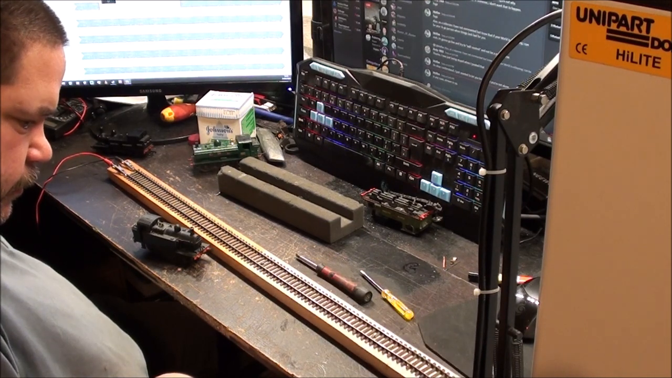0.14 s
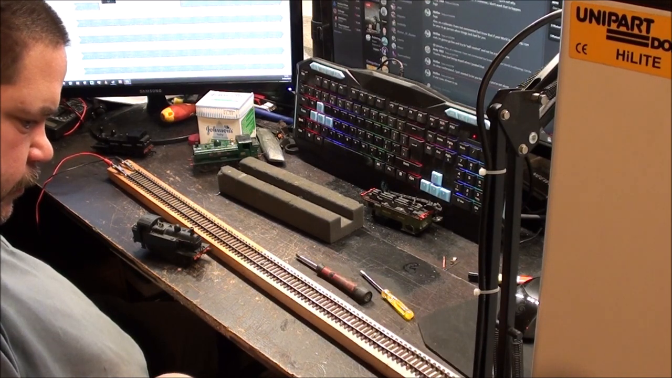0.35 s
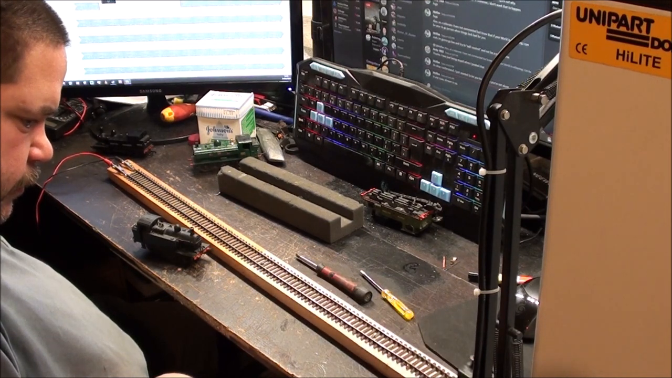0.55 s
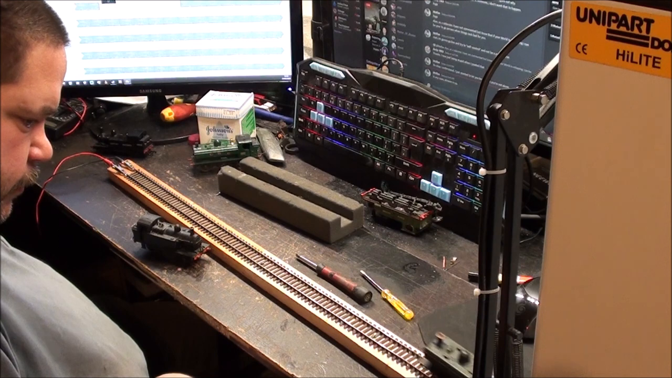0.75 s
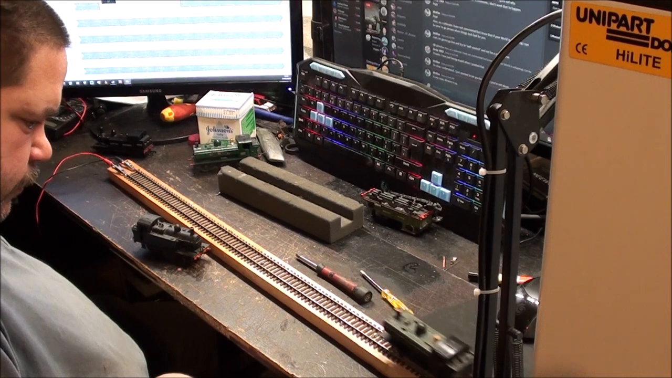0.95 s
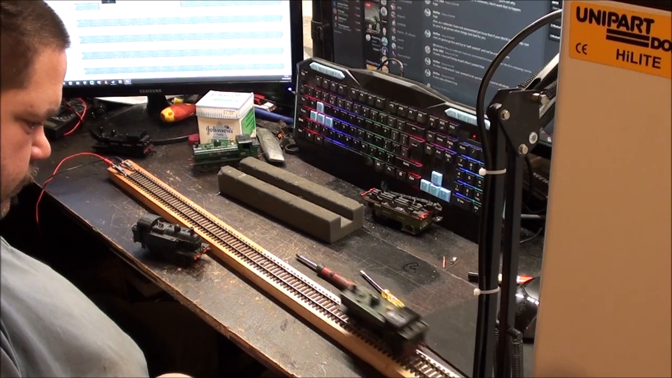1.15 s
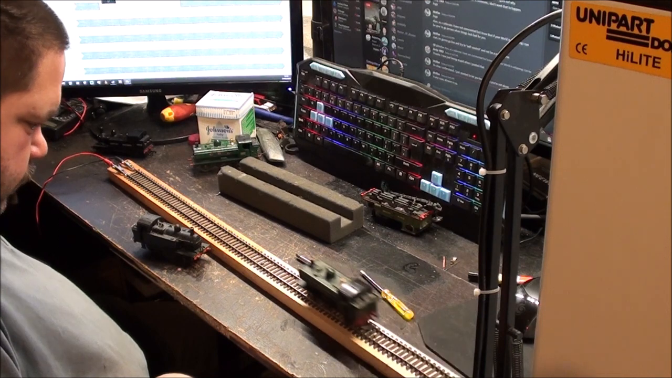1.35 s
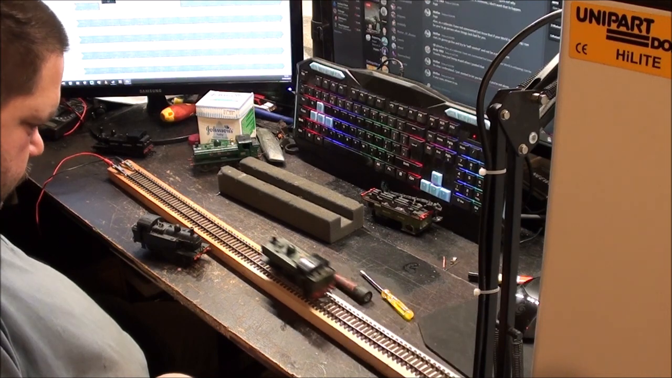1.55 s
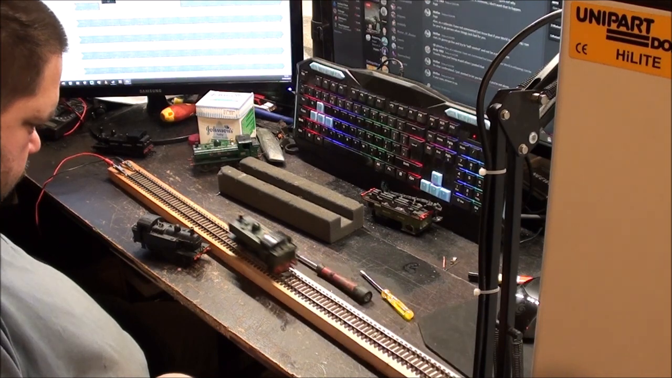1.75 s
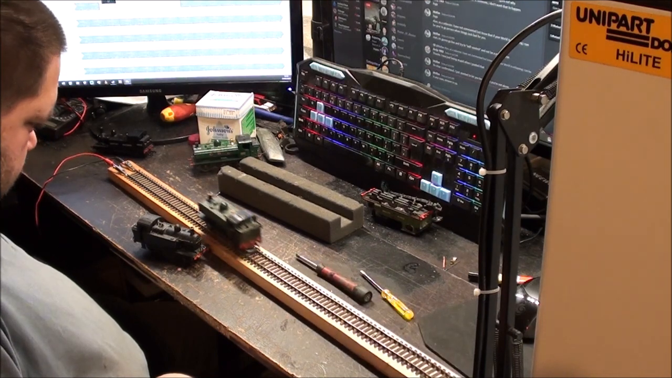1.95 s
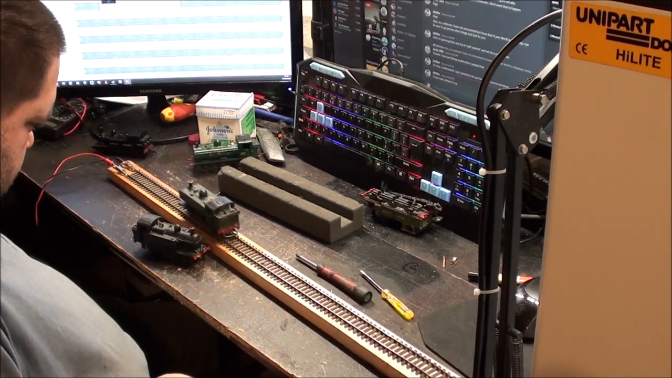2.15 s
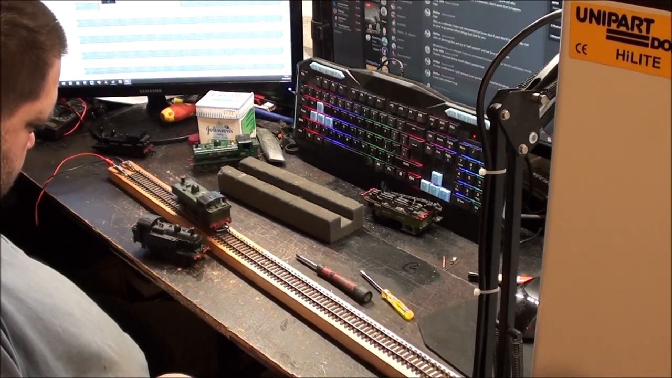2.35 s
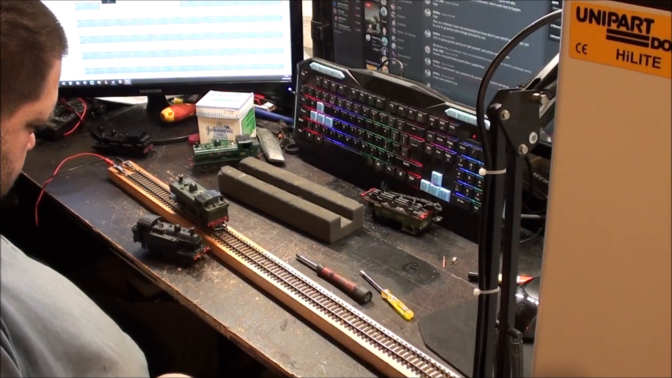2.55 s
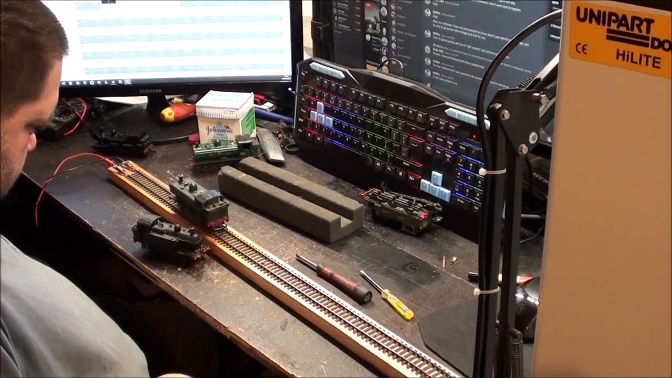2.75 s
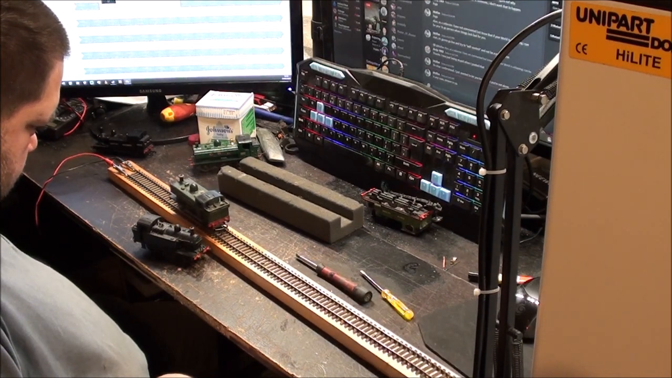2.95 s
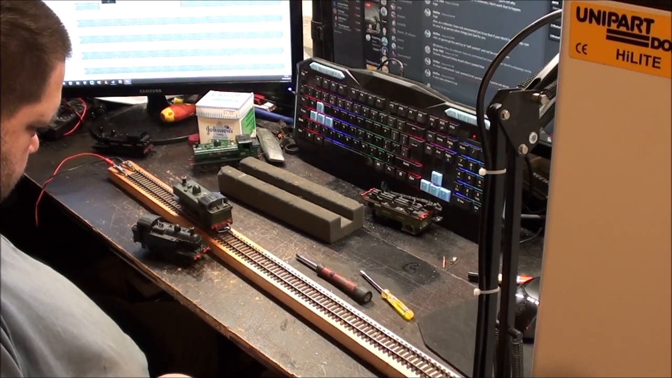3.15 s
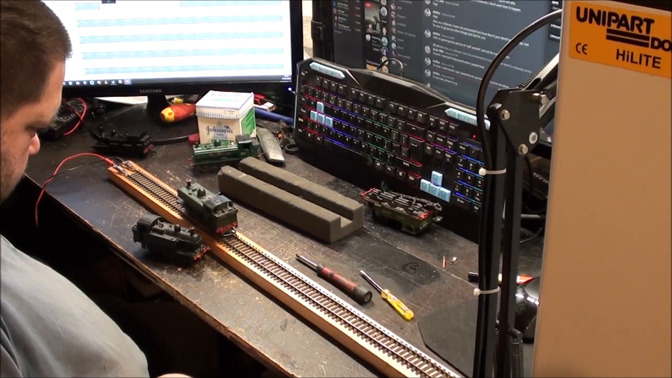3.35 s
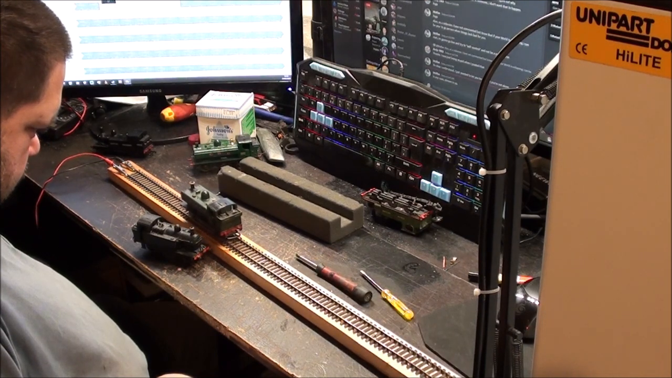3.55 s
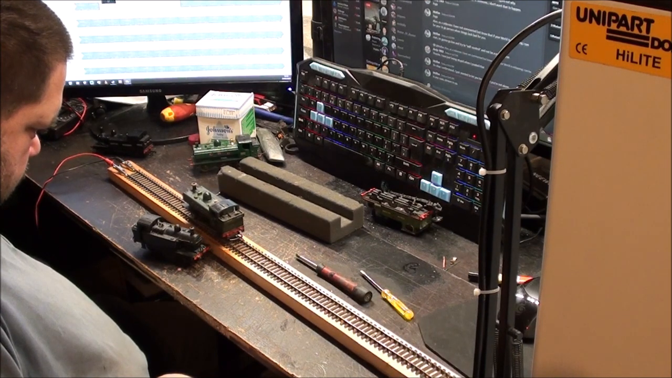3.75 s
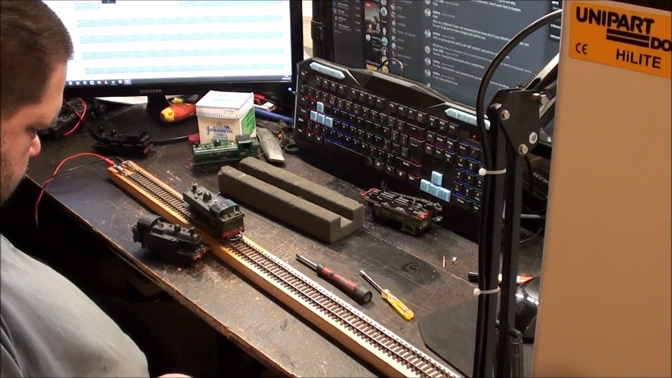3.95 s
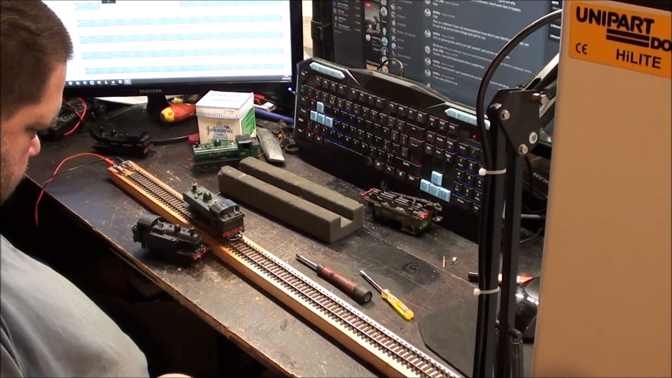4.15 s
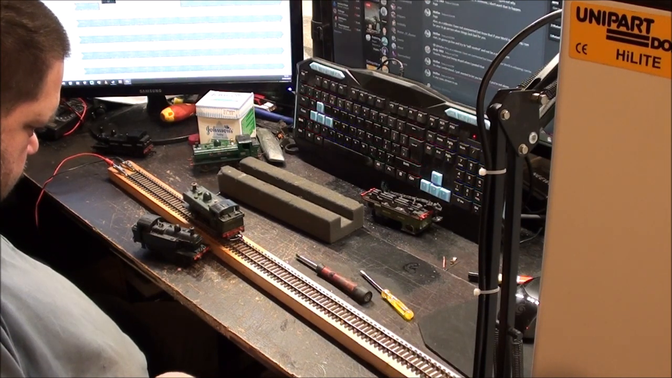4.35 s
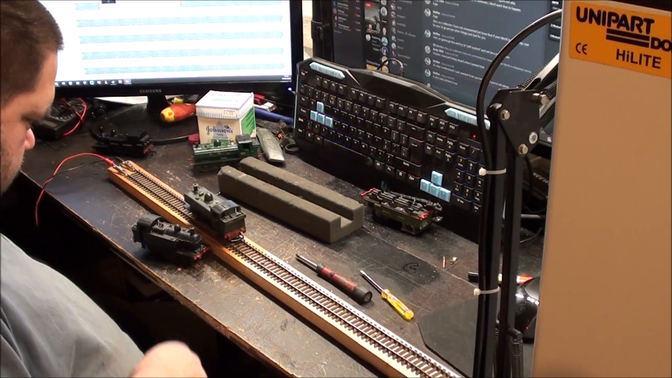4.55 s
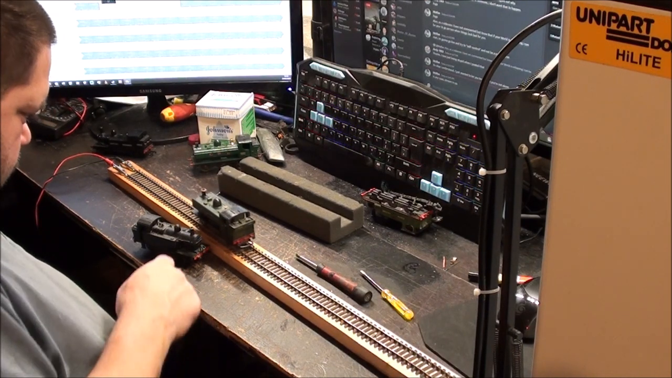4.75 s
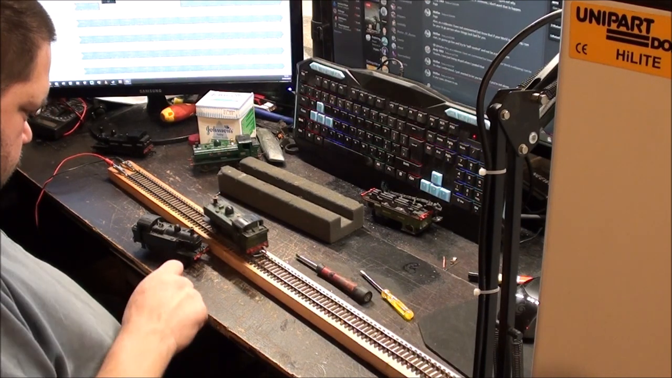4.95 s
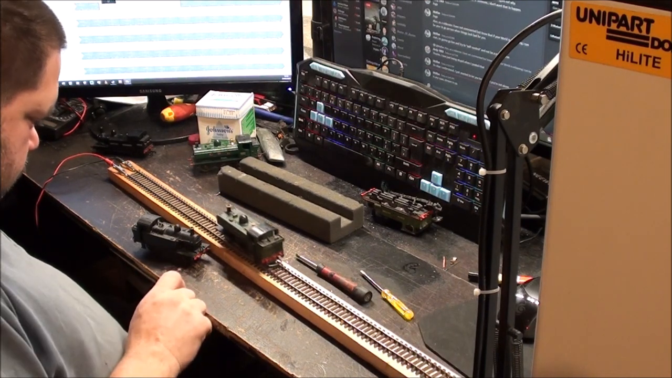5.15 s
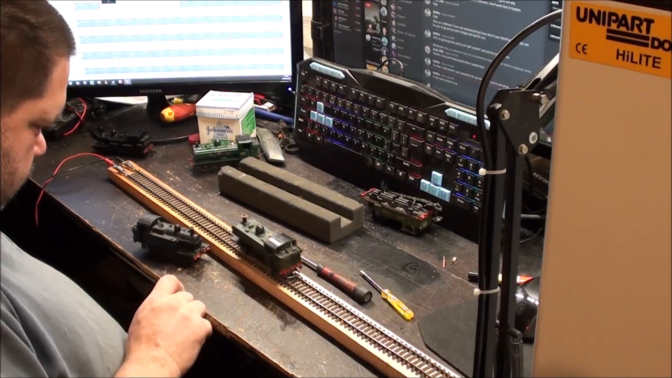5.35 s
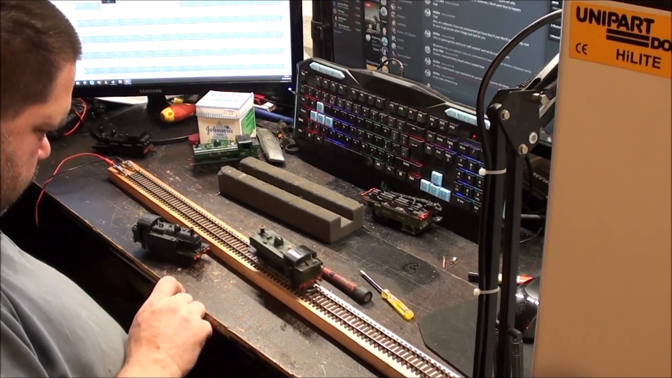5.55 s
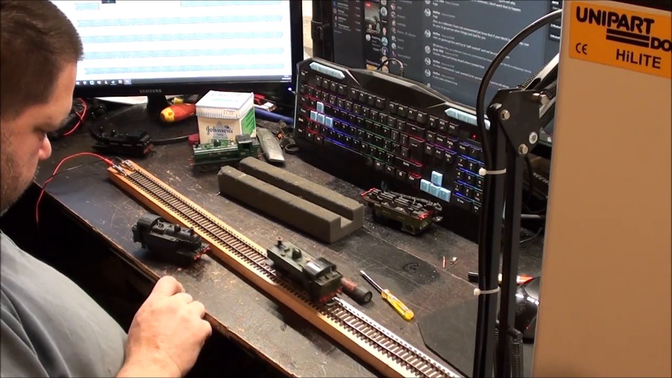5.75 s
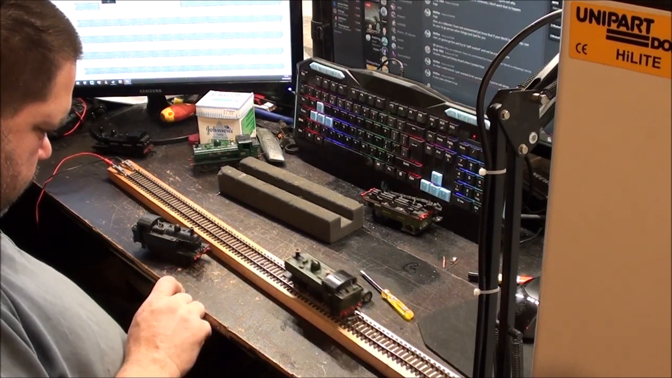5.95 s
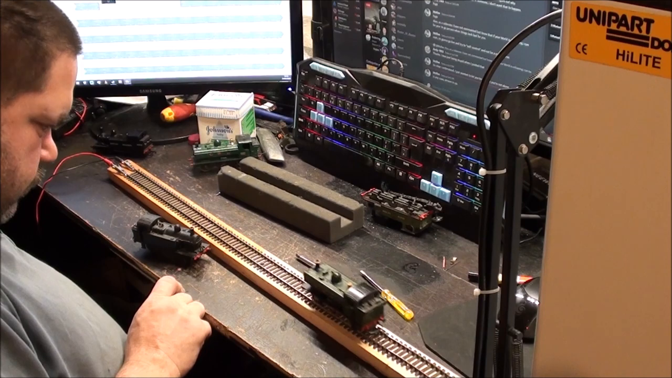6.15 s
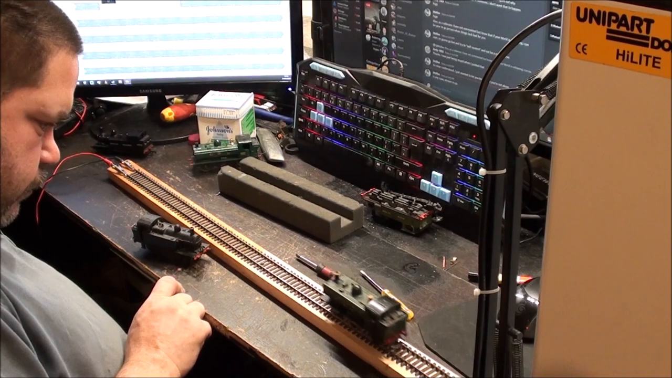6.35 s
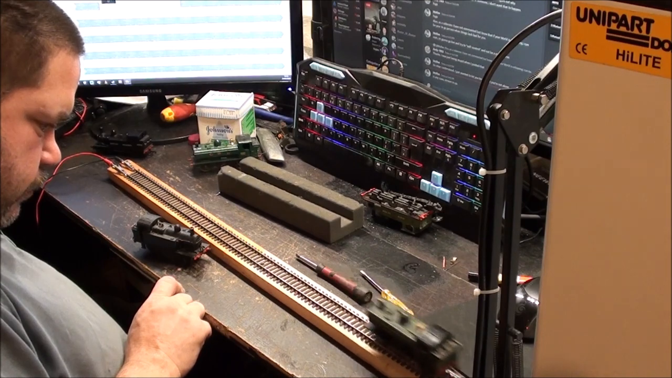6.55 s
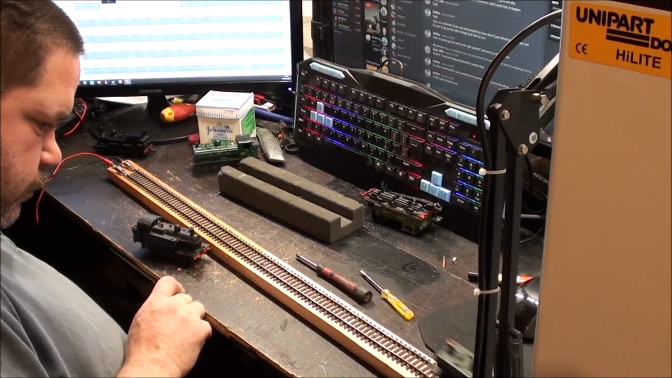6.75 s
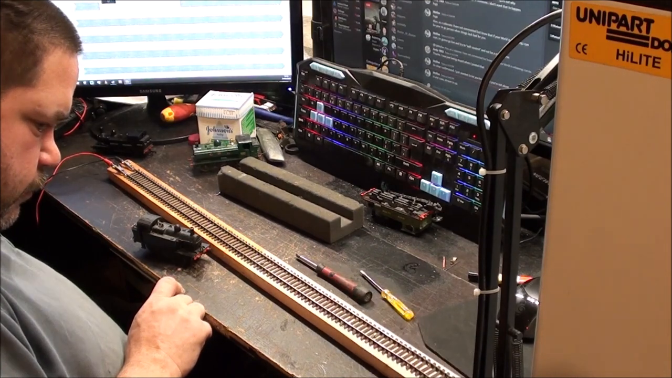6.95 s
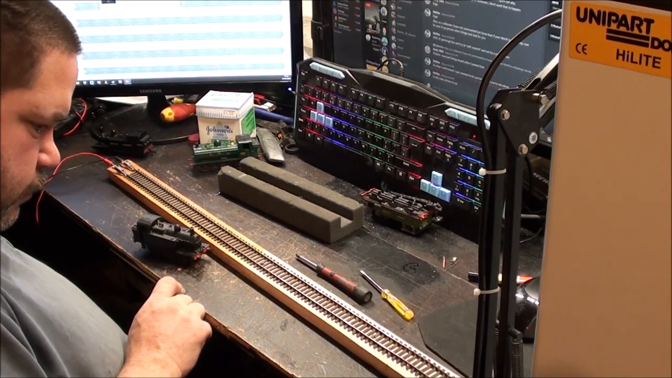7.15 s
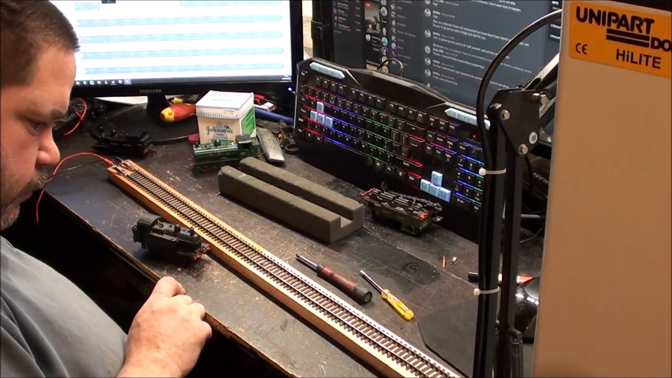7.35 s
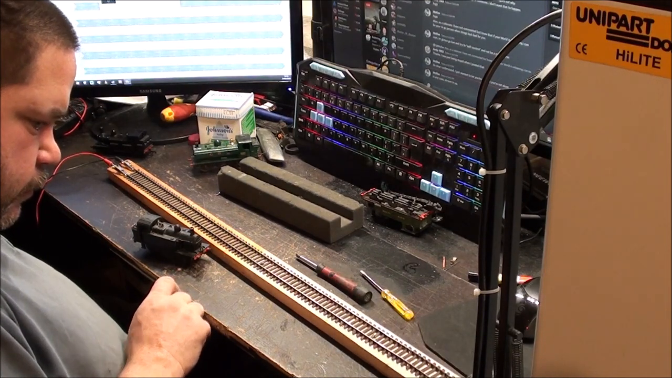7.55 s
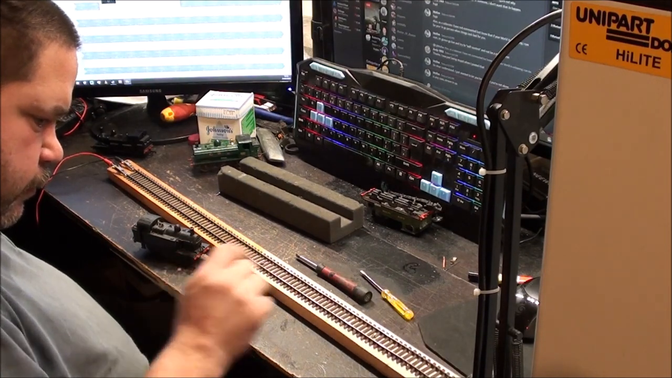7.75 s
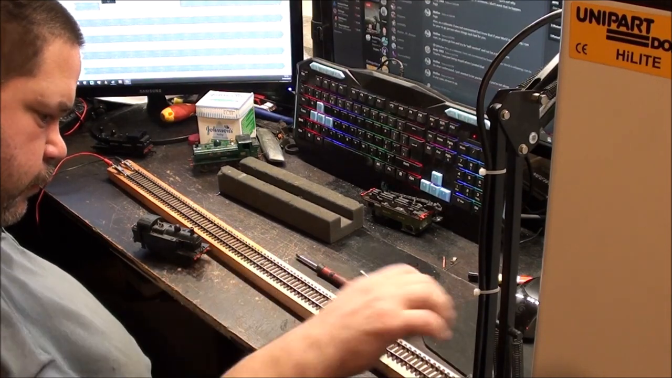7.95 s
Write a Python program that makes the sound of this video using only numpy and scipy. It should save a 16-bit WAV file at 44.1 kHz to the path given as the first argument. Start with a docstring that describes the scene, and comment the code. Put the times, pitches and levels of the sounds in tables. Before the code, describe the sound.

Over computer fan hum, a tiny electric train whirrs out, pauses with plastic scrapes and ticks, returns more quietly, speeds up and tumbles with knocks.

```python
"""Computer fans hum in a small room; a scrape and a ringing whirr precede a model tank locomotive's start.
It runs up a desk-top track: gears rattle and whine, wheels hiss, brushes squeak and hiss with a 100 Hz pulse.
It stops amid short scrapes like a controller's knob, creeps, comes back and tumbles off the near end.
The mechanism stirs faintly afterwards. Sources are shaped noise, random impacts, resonances and decaying tones."""
import sys
import numpy as np
from scipy import signal
from scipy.fft import rfft, irfft, next_fast_len
from scipy.io import wavfile
from scipy.ndimage import uniform_filter1d, map_coordinates

SR = 44100
rng = np.random.default_rng(int(sys.argv[2]) if len(sys.argv) > 2 else 0)


def write(x):
    x = np.atleast_2d(x).T
    wavfile.write(sys.argv[1], SR, np.round(np.clip(x, -1, 1) * 32767).astype(np.int16))

N = 352800
TIME = np.arange(N) / SR

# All levels in the tables are relative; later gains apply.
# Fan rush spectrum: freq_hz, level_db
FAN_SPECTRUM = [(20, -38), (80, 1), (157, -4), (300, -2), (812, -6), (1090, -8.5), (1680, -15),
                (15800, -23.5)]
# Fan whirr bands: centre_hz, width_hz, level_db
FAN_WHIRR = [(85.5, 2.1, -52), (187, 29, -48), (883, 17, -58), (3440, 51, -56.5)]
# Diffuse room decay: freq_hz, t60_s
ROOM_DECAY = [(150, 0.37), (4000, 0.18), (14000, 0.054)]
# Straining motor: time_s, level_db
STRAIN_LEVEL = [(0.225, -52), (0.25, -36), (0.42, -35.5), (0.56, -44)]
# Chassis modes under strain: centre_hz, width_hz, level_db
STRAIN_MODES = [(861, 35, 2), (2750, 90, 1), (3580, 70, -5), (4940, 120, -3), (6160, 80, -8)]
# Dry scrapes: peak_s, rise_s (from -12 dB), fall_s (to -20 dB), ring_db, rasp_db
SCRAPE_EVENTS = [(0.254, 0.019, 0.42, -50, -33.5), (2.085, 0.055, 0.2, -29, -27),
                 (2.596, 0.0096, 0.052, -26.5, -39), (2.621, 0.016, 0.047, -19, -27.5),
                 (2.665, 0.015, 0.11, -32.5, -35), (2.805, 0.04, 0.19, -30, -33),
                 (2.946, 0.052, 0.065, -33.5, -30), (4.305, 0.017, 0.093, -50, -37)]
# Small hollow housing, two equal resonances in cascade: centre_hz, half_width_hz (of each), level_db
HOUSING_MODES = [(1380, 130, -11), (2130, 120, -2), (2440, 160, -3), (2740, 110, 0)]
# Scrape rasp spectrum: freq_hz, level_db
SCRAPE_SPECTRUM = [(600, -25), (1400, -4), (3000, 0), (5100, -1), (10500, -12), (16000, -42)]
# Run up the track: time_s, rattle_db, hiss_db
OUTWARD_RUN = [(0.3, -38, -64), (0.48, -27, -35.5), (0.69, -20, -25), (0.88, -21.5, -22), (0.905, -25, -25),
               (1.26, -21.5, -23.5), (1.92, -21, -23), (2.26, -29.5, -33.5), (2.41, -33, -44),
               (2.56, -48, -65)]
# Run back: time_s, rattle_db, hiss_db
RETURN_RUN = [(4.501, -45, -57), (4.71, -33.5, -43.5), (5.229, -27, -35), (6.21, -27.5, -36.5),
              (6.28, -27, -39.5), (6.46, -19, -24.5), (6.59, -19, -18.5), (6.93, -19.5, -25.5),
              (7.01, -23.5, -31), (7.07, -40, -47)]
# Motor barely turning: start_s, rise_s, hold_s, rattle_db
CRAWL_EVENTS = [(2.99, 0.17, 0.48, -38.8), (7.417, 0.036, .04, -35), (7.545, .015, .02, -38),
                (7.945, .025, .05, -37)]
# Gear rasp spectrum, forward: freq_hz, level_db
FORWARD_SPECTRUM = [(40, -54), (520, -22.5), (1000, -14.5), (1430, -12.5), (1580, -3.5), (2130, -2),
                    (2320, -18.5), (2800, -6), (3200, -14.5), (7000, -15), (12000, -44)]
# Gear rasp spectrum, reverse: freq_hz, level_db
REVERSE_SPECTRUM = [(40, -34), (150, -18.5), (1430, -16), (1650, -4.5), (2170, -4.5), (2340, -11),
                    (3100, -13), (5700, -16), (12000, -36)]
# Chassis modes under gear mesh: centre_hz, width_hz, level_db
CHASSIS_MODES = [(2490, 60, 0), (3150, 60, 2), (3490, 70, 0), (3700, 70, 2), (5920, 110, 3), (7560, 120, 1)]
# Rattle bands, pitch by place: near_hz, middle_hz, far_hz, width_hz, level_db, wake_db (rattle at half response)
RATTLE_BANDS = [(2082, 2130, 2240, 46, -15, -66), (2046, 2030, 2090, 26, -6.5, -32),
                (1833, 1900, 1900, 39, -8.5, -64), (1882, 1600, 1810, 42, -10, -42.5),
                (1635, 1560, 1650, 27, -5.5, -28)]
# Low motor hum bands: centre_hz, width_hz, level_db
MOTOR_HUM_BANDS = [(910, 24, -1.5), (405, 45, -9)]
# Brief gear snags: start_s, level_db
SNAG_EVENTS = [(3.398, -29), (5.583, -14.5), (5.614, -24)]
# Snag spectrum: freq_hz, level_db
SNAG_SPECTRUM = [(1400, -35), (1900, 1), (2200, 11), (2600, -32), (9000, -35)]
# Rolling hiss spectrum: freq_hz, level_db
RAIL_SPECTRUM = [(2300, -18), (5000, -5), (7800, -2.5), (9000, -8.5), (10000, -1), (11300, -7),
                 (12200, -12.5), (15800, -18.5)]
# Motor brush hiss, response squared: centre_hz, width_hz (before squaring), level_db (before squaring)
BRUSH_HISS_MODES = [(9880, 570, 12.5), (10960, 380, 3), (8700, 1900, 8)]
# Gear whine, outward: time_s, pitch_hz, level_db
OUTWARD_WHINE = [(0.35, 2880, -61), (0.76, 2954, -31), (0.98, 2990, -34), (1.2, 2694, -37),
                 (1.7, 2750, -34), (2.36, 2886, -38), (2.48, 2800, -56)]
# Gear whine, pulling away in reverse: time_s, pitch_hz, level_db
RETURN_WHINE = [(4.53, 2080, -57), (4.68, 1927, -36.5), (5.0, 1880, -32.5), (5.45, 1790, -43)]
# Wheel joint and coupling clicks: start_s, level_db
CLICK_EVENTS = [(0.3865, -33), (4.809, -34), (4.9327, -34), (7.368, -36), (7.4636, -32.5)]
# Click spectrum: freq_hz, level_db
CLICK_SPECTRUM = [(500, -10), (1500, 11), (6000, 2.5), (8000, 5), (11000, 10), (15000, -23)]
# Coupling modes: centre_hz, width_hz, level_db (over the dry click)
COUPLING_MODES = [(880, 27, 17), (5440, 35, 12), (5940, 40, 12)]
# Dull controller ticks: start_s, level_db
TICK_EVENTS = [(3.16, -39), (3.685, -36), (3.827, -40), (4.275, -36.5), (4.502, -36.5), (7.309, -43.5)]
# Tick spectrum: freq_hz, level_db
TICK_SPECTRUM = [(600, -30), (1500, 1), (3000, -2), (4300, 5.5), (8500, -5), (14000, -26)]
# Controller case modes: centre_hz, width_hz, level_db (over the dry tick)
CASE_MODES = [(4310, 27, 6.2), (4970, 35, 11)]
# Brush squeak, outward: time_s, pitch_hz, level_db
OUTWARD_SQUEAK = [(0.48, 6500, -52), (0.69, 6760, -26.5), (0.88, 6710, -26), (0.92, 6660, -33),
                  (1.9, 6640, -28), (2.21, 6520, -37), (2.28, 6400, -36), (2.54, 6380, -47)]
# Brush squeak, crawling: time_s, pitch_hz, level_db
CRAWL_SQUEAK = [(3.03, 6400, -53), (3.31, 6520, -50), (3.38, 6660, -46), (3.66, 6450, -43),
                (3.76, 6600, -57)]
# Brush squeak, coming back: time_s, pitch_hz, level_db
RETURN_SQUEAK = [(4.46, 6500, -58), (4.51, 6590, -46.5), (4.85, 6450, -34.5), (6.3, 6570, -34.5),
                 (6.95, 6700, -31), (7.07, 6750, -54)]
# Ring of the late click: time_s, pitch_hz, level_db
LATE_CLICK_RING = [(7.46, 6700, -43), (7.55, 6700, -55)]
# Very short bright snaps, like wheel sparks: start_s, level_db
SPARK_EVENTS = [(0.9017, -3), (6.984, -13), (7.0155, -13)]
# Spark spectrum: freq_hz, level_db
SPARK_SPECTRUM = [(4000, -25), (6000, -4), (8300, 0), (10000, -12), (15000, -22)]
# Soft desk bumps: start_s, pitch_hz, level_db
BUMP_EVENTS = [(1.872, 139, -28), (5.311, 237, -18.5)]
# Tumble off the track end: start_s, clack_db, thud_db
TUMBLE_KNOCKS = [(6.9402, -9.5, -26.5), (6.944, -24, -16), (6.956, -18, -21), (6.973, -35, -34),
                 (6.992, -21.5, -21), (7.012, -18, -25), (7.033, -26, -30)]
# Plastic clack spectrum: freq_hz, level_db
CLACK_SPECTRUM = [(400, -3), (1200, 15.5), (2500, 11), (5000, -5), (6700, 12), (8500, -2), (16000, -21)]
# Desk thud spectrum: freq_hz, level_db
DESK_SPECTRUM = [(30, -22), (95, -19), (135, 3), (270, -1), (480, -4), (800, -10), (4000, -60)]
# Stereo width: freq_hz, side_db
SIDE_SPECTRUM = [(60, -29), (400, -11.0), (1500, -7.0), (9500, -9.0), (12000, -31)]

THROB_HZ, TOP_HZ, LOW_CUT_HZ = 100, 15870, 45
COAST_DB_PER_S, CRAWL_HISS_DB = 150.5, -16  # decay after a crawl; its hiss relative to rattle
REVERSE_S, SPEED_POWER = 3.6, 0.73  # direction switch; speed = effort ** power
NEAR_PAN_DB, FAR_PAN_DB, DESK_PAN_DB = -0.2, 1.4, 2.1  # left gain up, right gain down
FORWARD_DB, REVERSE_DB = -1.5, -2.5  # gear rasp
BRUSH_HISS_HALF_DB = -36.5  # run hiss at which the brush hiss share reaches half
SHIFT_SHARE, SHIFT_PER_S, SHIFT_DB = .011, 6, 3  # rattle band pitch scatter, wander rate, strength limit
WHINE_WIDTH_HZ, SQUEAK_WIDTH_HZ, SQUEAK_WANDER_HZ = 16.4, 92, 45


def amp(db):
    """Decibels to gain."""
    return 10 ** (np.asarray(db) / 20)


def unit(x):
    """Scale to rms 1."""
    return x / np.sqrt(np.mean(x ** 2) + 1e-20)


def along(points, hz):
    """Interpolate (Hz, value) points on a log frequency axis."""
    freq_hz, value = np.transpose(points)
    return np.interp(np.log(hz + 1), np.log(freq_hz), value)


def wobble(rate_hz):
    """Smooth random curve with rate_hz knots a second."""
    knots = rng.standard_normal(int(N * rate_hz / SR) + 4)
    return map_coordinates(knots, [TIME * rate_hz])


def flutter(rate_hz, depth_db):
    """Smooth random gain bounded to +/- depth_db."""
    return amp(depth_db * np.tanh(wobble(rate_hz)))


def filtered(x, response):
    """Apply a complex frequency response."""
    size = next_fast_len(N + SR // 4, real=True)
    spectrum = rfft(x, size) * response(np.fft.rfftfreq(size, 1 / SR))
    return irfft(spectrum, size)[..., :N]


def colour(x, points, size=4096):
    """Minimum-phase, unit-energy filter following (Hz, dB) points."""
    cepstrum = irfft(np.log(amp(along(points, np.fft.rfftfreq(size, 1 / SR)))))
    cepstrum[1:size // 2] *= 2
    cepstrum[size // 2 + 1:] = 0
    kernel = irfft(np.exp(rfft(cepstrum)))
    return signal.oaconvolve(x, kernel / np.linalg.norm(kernel))[:N]


def resonance(modes, hz):
    """Summed band-pass response of (Hz, width Hz, dB) modes."""
    return sum(amp(db) * 1j * hz * width / (centre ** 2 - hz * hz + 1j * hz * width)
               for centre, width, db in modes)


def ringing(x, modes):
    """Excite resonant modes, at rms 1."""
    return unit(filtered(x, lambda hz: resonance(modes, hz)))


def sliding(x, hz, width_hz):
    """Resonance whose centre follows hz, at rms 1: shift to 0 Hz, low-pass, shift back."""
    turn = np.exp(2j * np.pi * np.cumsum(hz) / SR)
    pole = np.exp(-np.pi * abs(width_hz) / SR)
    return unit((turn * signal.lfilter([1], [1, -pole], x * turn.conj())).real)


def impacts(rate_hz, spread_db):
    """Random signed impacts of uneven size, power held steady as the rate varies."""
    chance, polarity = rng.random(N), rng.standard_normal(N)
    size = amp(spread_db * np.clip(rng.standard_normal(N), -2, 2))
    hits = (chance < rate_hz / SR) * np.sign(polarity) * size
    return unit(hits / np.sqrt(rate_hz))


def blows(rows, t60, spectrum):
    """Contacts at (s, dB) as exponentially dying noise bursts in the struck thing's colour."""
    envelope, t = np.zeros(N + SR), np.arange(SR // 2) / SR
    for start_s, db in rows:
        envelope[round(start_s * SR):][:len(t)] += amp(db - 60 * t / t60)
    return colour(envelope[:N] * rng.standard_normal(N), spectrum)


def throb(depth):
    """Rectified mains pushes the motor twice a cycle; rms 1."""
    return unit(np.exp(depth * np.cos(2 * np.pi * THROB_HZ * TIME)))


def gated_gain(time_s, level_db):
    """Gain along a dB curve, silent outside it."""
    return amp(np.interp(TIME, time_s, level_db, left=-np.inf, right=-np.inf))


def contour(*curves):
    """Pitch and gain of successive (s, Hz, dB) curves, silent between them."""
    time_s, pitch_hz, _ = np.concatenate(curves).T
    gain = sum(gated_gain(t, db) for t, _, db in map(np.transpose, curves))
    return np.interp(TIME, time_s, pitch_hz), gain


def run_gain(column):
    """Smoothed rattle (1) or hiss (2) gain of both runs."""
    tables = [np.transpose(rows) for rows in (OUTWARD_RUN, RETURN_RUN)]
    gain = sum(gated_gain(table[0], table[column]) for table in tables)
    return np.abs(uniform_filter1d(gain, size=400))


def crawl_gain():
    """Crawls rise linearly, hold and coast down exponentially."""
    gain = np.zeros(N)
    for start_s, rise_s, hold_s, db in CRAWL_EVENTS:
        coast_s = np.maximum(TIME - start_s - rise_s - hold_s, 0)
        gain += amp(db - COAST_DB_PER_S * coast_s) * np.clip((TIME - start_s) / rise_s, 0, 1)
    return gain


def motion():
    """Motor effort, run hiss and integrated place (0 near end, 1 far end)."""
    crawl = crawl_gain()
    effort = run_gain(column=1) + crawl
    hiss = run_gain(column=2) + amp(CRAWL_HISS_DB) * crawl
    travel = np.cumsum(np.sign(REVERSE_S - TIME) * effort ** SPEED_POWER)
    return effort, hiss, np.clip(travel / travel.max(), 0, 1)


def panned(x, left_db):
    """Raise left and lower right by left_db."""
    return np.array([x * amp(left_db), x * amp(-left_db)])


def fans():
    """Computer fans: shared and per-channel rush noise, plus narrow resonant whirr."""
    common = colour(rng.standard_normal(N), FAN_SPECTRUM)
    apart = np.array([colour(rng.standard_normal(N), FAN_SPECTRUM) for _ in range(2)])
    # narrower bands get more gain, for equal noise power
    bands = [(centre, width, db + 10 * np.log10(SR / np.pi / width)) for centre, width, db in FAN_WHIRR]
    whirr = filtered(rng.standard_normal(N), lambda hz: resonance(bands, hz))
    return amp(-50.5) * common + amp(-37.5) * apart + whirr


def room(x):
    """Diffuse two-channel tail: noise decaying at a frequency-dependent rate."""
    hz, t, noise = signal.stft(rng.standard_normal((2, SR // 3)), SR, nperseg=256)
    decay = amp(-60 * t / along(ROOM_DECAY, hz)[:, None])
    tail = signal.istft(noise * decay, SR, nperseg=256)[1]
    delayed = np.pad(x, (200, 0))[None]  # samples
    return signal.oaconvolve(delayed, tail / np.linalg.norm(tail[0]), axes=1)[:, :N]


def scrapes():
    """Grainy friction: swelling random impacts ring a small hollow housing and rasp."""
    ring, rasp = np.zeros(N), np.zeros(N)
    for peak_s, rise_s, fall_s, ring_db, rasp_db in SCRAPE_EVENTS:
        t = TIME - peak_s
        swell = amp(np.where(t < 0, -12 * (t / rise_s) ** 2, -20 * t / fall_s))
        ring += amp(ring_db) * swell
        rasp += amp(rasp_db) * swell

    def housing_response(hz):
        """Cascaded resonance pairs of the housing."""
        return sum(amp(db) * resonance([(centre, 2 * half_width, 0)], hz) ** 2
                   for centre, half_width, db in HOUSING_MODES)

    housing = unit(filtered(impacts(4300, spread_db=7.0), housing_response))
    grains = unit(colour(impacts(7000, spread_db=3.5), SCRAPE_SPECTRUM))
    return ring * housing * unit(flutter(50, depth_db=4.0)) + rasp * grains


def strain():
    """Ringing whirr as power comes on: throbbing impacts excite chassis modes."""
    gain = gated_gain(*np.transpose(STRAIN_LEVEL))
    return gain * ringing(impacts(5000, spread_db=-2.0) * throb(depth=0.27), STRAIN_MODES)


def rattle(clash, effort, place):
    """Rattle bands whose pitch slides with the engine's place, as desk reflections shift."""
    bands = np.zeros(N)
    for near_hz, middle_hz, far_hz, width_hz, db, wake_db in RATTLE_BANDS:
        track_hz = np.interp(place, [0, .5, 1], [near_hz, middle_hz, far_hz])
        hz = track_hz * (1 + SHIFT_SHARE * wobble(SHIFT_PER_S))
        awake = effort / (effort + amp(wake_db))
        strength = amp(db) * awake * unit(flutter(SHIFT_PER_S, SHIFT_DB))
        bands += strength * sliding(clash, hz, width_hz)
    # steep low cut at 1440 Hz
    return filtered(bands, lambda hz: 1 / (1 + (1440 / (hz + 1)) ** 24))


def gears(effort, place):
    """Teeth clash across backlash, more often with effort: rasp, rattle bands and snags."""
    push = throb(depth=0.13)
    grains = impacts(500 + 20000 * effort, spread_db=5.0) + 1.01 * rng.standard_normal(N)
    mesh = grains * push * flutter(90, depth_db=2.5)
    mesh = filtered(mesh, lambda hz: 1 + 0.46 * resonance(CHASSIS_MODES, hz))
    backward = np.clip((TIME - REVERSE_S) * 10, 0, 1)  # other tooth flank bears in reverse
    forward_rasp = amp(FORWARD_DB) * (1 - backward) * unit(colour(mesh, FORWARD_SPECTRUM))
    reverse_rasp = amp(REVERSE_DB) * backward * unit(colour(mesh, REVERSE_SPECTRUM))
    clash = impacts(250 + 4000 * effort, spread_db=3.0) * push * flutter(60, depth_db=3.0)
    bands = rattle(clash, effort, place)
    snags = blows(SNAG_EVENTS, t60=0.032, spectrum=SNAG_SPECTRUM)
    return effort * (forward_rasp + reverse_rasp + bands) + snags


def motor_hum(effort, place):
    """Low motor hum from resonant noise, present even at a crawl and stronger toward the far end."""
    gain = amp(-34.0) * effort ** 0.47 * (.5 + place)
    return gain * ringing(rng.standard_normal(N), MOTOR_HUM_BANDS)


def wheels(hiss):
    """Wheels grind over rail grit: impacts and noise, lightly throbbing."""
    grains = impacts(6000, spread_db=6.5) + 0.77 * rng.standard_normal(N)
    grit = unit(colour(grains, RAIL_SPECTRUM)) * throb(depth=0.1)
    return hiss * amp(-0.5) * grit * flutter(40, depth_db=3.0)


def brush_hiss(hiss):
    """Motor brush hiss around 10 kHz, pulsing at 100 Hz and growing with speed."""
    pulses = rng.standard_normal(N) * throb(depth=1.1) * flutter(100, depth_db=6)
    band = unit(filtered(pulses, lambda hz: resonance(BRUSH_HISS_MODES, hz) ** 2))
    share = hiss / (hiss + amp(BRUSH_HISS_HALF_DB))
    return hiss * share * band


def whine():
    """Gear train sings in one narrow, grainy band that bends in pitch under load."""
    pitch_hz, gain = contour(OUTWARD_WHINE, RETURN_WHINE)
    return gain * sliding(impacts(900, spread_db=1.0) * throb(depth=0.54), pitch_hz, WHINE_WIDTH_HZ)


def clicks():
    """Bright wheel and coupling clicks and dull controller ticks, each burst with a short ring."""
    bright = blows(CLICK_EVENTS, t60=0.047, spectrum=CLICK_SPECTRUM)
    bright = filtered(bright, lambda hz: 1 + resonance(COUPLING_MODES, hz))
    dull = blows(TICK_EVENTS, t60=0.076, spectrum=TICK_SPECTRUM)
    dull = filtered(dull, lambda hz: 1 + resonance(CASE_MODES, hz))
    return amp(5.5) * bright + amp(2.0) * dull


def squeaks_and_late_ring(effort):
    """Brushes catch on the commutator, squeaking or whistling; a late click rings in the same sliding band."""
    catch_cycles = np.cumsum(45 + 2500 * effort) / SR + 0.58 * wobble(30)
    catch = np.exp(1.3 * np.cos(2 * np.pi * catch_cycles))
    pitch_hz, gain = contour(OUTWARD_SQUEAK, CRAWL_SQUEAK, RETURN_SQUEAK, LATE_CLICK_RING)
    wandering_hz = pitch_hz + SQUEAK_WANDER_HZ * wobble(25)
    return gain * sliding(catch * rng.standard_normal(N), wandering_hz, SQUEAK_WIDTH_HZ)


def sparks():
    """Spark-like snaps: bright noise bursts dying within milliseconds."""
    return blows(SPARK_EVENTS, t60=.004, spectrum=SPARK_SPECTRUM)


def knocks():
    """Plastic clacks and desk thuds are noise bursts; soft bumps boom as damped sines."""
    clack = blows([(s, db) for s, db, _ in TUMBLE_KNOCKS], t60=0.062, spectrum=CLACK_SPECTRUM)
    thud = blows([(s, db) for s, _, db in TUMBLE_KNOCKS], t60=.12, spectrum=DESK_SPECTRUM)
    boom = np.zeros(N)
    for start_s, pitch_hz, db in BUMP_EVENTS:
        t = np.maximum(TIME - start_s, 0)
        envelope = amp(db - 60 * t / 0.059) * (1 - np.exp(-t / 0.0027))
        boom += envelope * np.sin(2 * np.pi * pitch_hz * t)
    return clack + thud + boom


def scene():
    """Engine drifting left as it moves away, plus desk noises, room tail and fans."""
    effort, hiss, place = motion()
    engine = gears(effort, place) + motor_hum(effort, place) + whine() + strain()
    engine = engine + wheels(hiss) + brush_hiss(hiss) + squeaks_and_late_ring(effort)
    engine = amp(-0.25) * engine
    small = clicks() + scrapes()
    near = sparks() + knocks()
    engine_pan_db = NEAR_PAN_DB + place * (FAR_PAN_DB - NEAR_PAN_DB)
    direct = panned(engine, engine_pan_db) + panned(small, DESK_PAN_DB) + panned(near, NEAR_PAN_DB)
    return direct + amp(-7.5) * room(engine + small + near) + fans()


def record(dry):
    """Closely spaced microphones: narrow stereo, near mono in bass and top, low cut and band limit."""
    mid = (dry[0] + dry[1]) / 2
    side = filtered((dry[0] - dry[1]) / 2, lambda hz: amp(along(SIDE_SPECTRUM, hz)))
    stereo = np.array([mid + side, mid - side])
    return filtered(stereo, lambda hz: (hz < TOP_HZ) * hz ** 2 / np.hypot(hz ** 2, LOW_CUT_HZ ** 2))


dry = scene()
out = record(dry)
write(out)
```